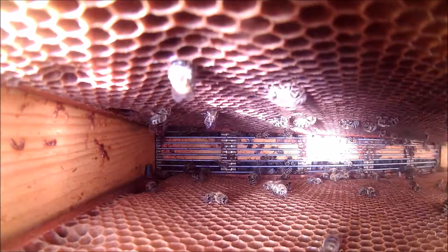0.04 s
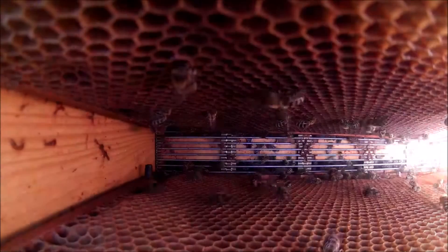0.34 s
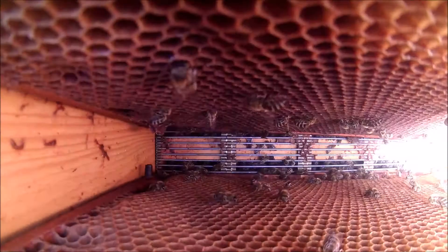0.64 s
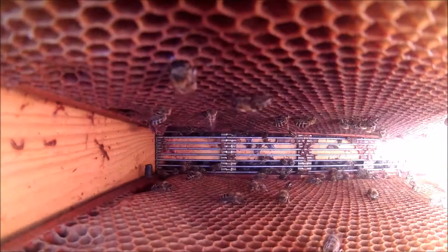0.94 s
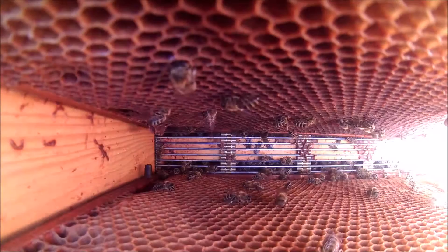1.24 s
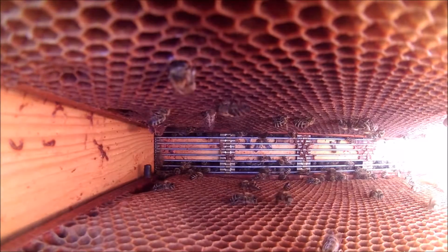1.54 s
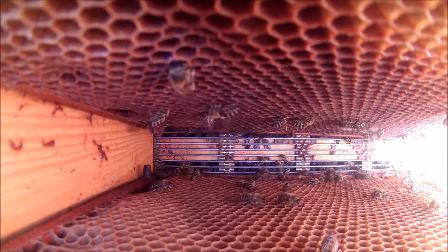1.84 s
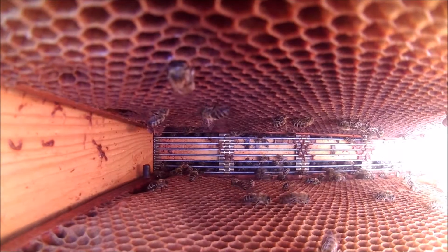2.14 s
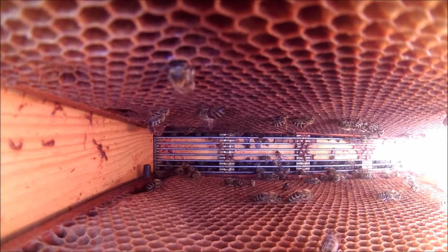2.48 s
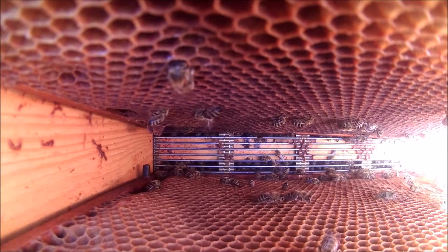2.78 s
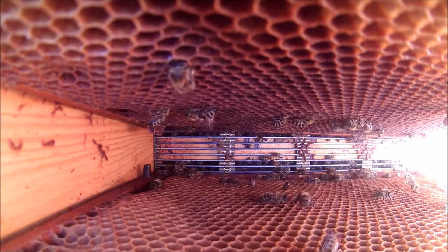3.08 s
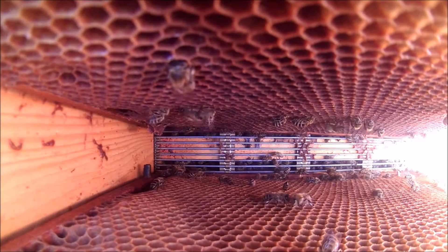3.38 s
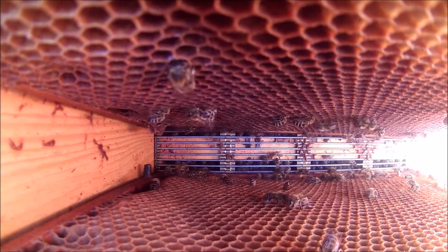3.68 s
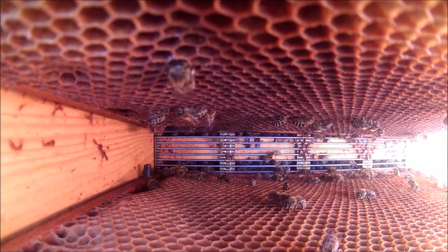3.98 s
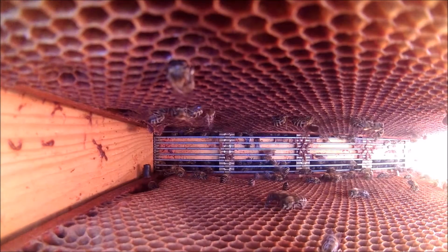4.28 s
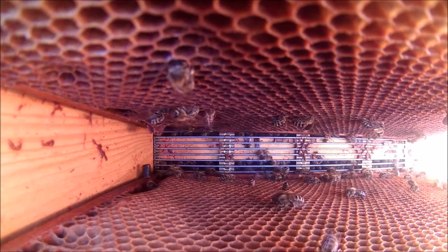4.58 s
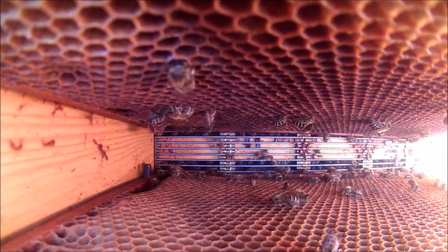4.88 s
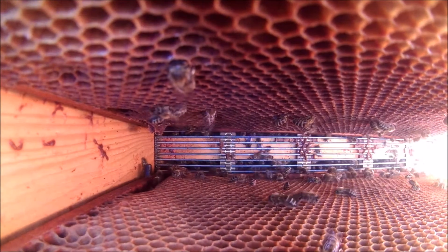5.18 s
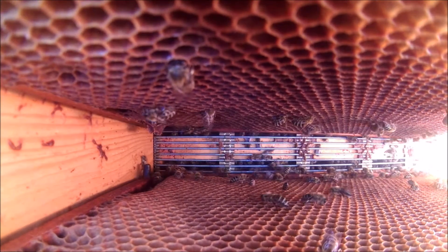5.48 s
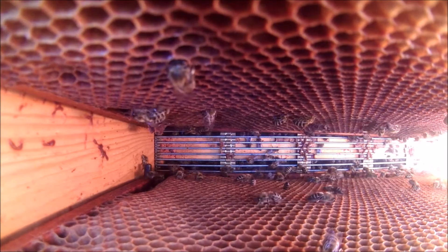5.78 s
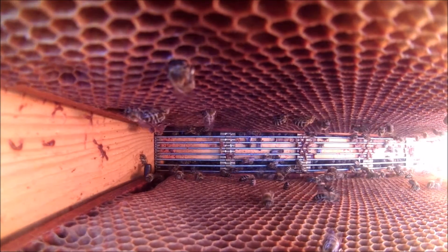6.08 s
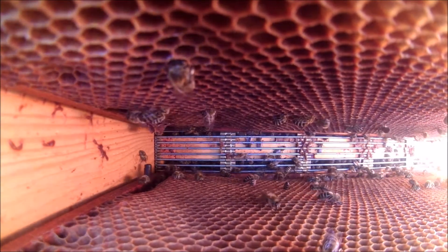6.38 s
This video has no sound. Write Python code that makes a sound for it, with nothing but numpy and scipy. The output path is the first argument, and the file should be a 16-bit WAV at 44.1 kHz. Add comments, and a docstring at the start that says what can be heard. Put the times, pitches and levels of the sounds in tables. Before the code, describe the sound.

Inside a beehive, bees and wax comb scrape right against the microphone's plastic case in short, grainy strokes with small ticks. The case slides roughly, then lands on the wooden frame with one loud knock and a couple of dull bounces. Lighter scuffs, rubbing and scattered clicks follow, with two brief, faint wing whirs. A faint hive murmur and hiss lie underneath, all heard on the left only.

```python
"""Inside a beehive, a small camera lies between two honeycombs. Bees and comb scrape its case in grainy
strokes of tiny slips; small contacts tick on the plastic and wings whir briefly. The case slides, then
settles on the wooden frame with one overloading knock and two dull bounces. Under it all lie a faint
hive murmur, preamplifier hiss and a pulsing electronic whine. Only the left channel is live."""
import sys
import numpy as np
from scipy import signal
from scipy.fft import rfft, irfft, next_fast_len
from scipy.io import wavfile
from scipy.ndimage import uniform_filter1d, map_coordinates

SR = 44100
rng = np.random.default_rng(int(sys.argv[2]) if len(sys.argv) > 2 else 0)


def wav_out(sig):
    """Save sig, one row per channel (or a flat mono array), as 16-bit PCM at SR to the path in sys.argv[1]."""
    wavfile.write(sys.argv[1], SR, np.round(np.clip(np.atleast_2d(sig).T, -1, 1) * 32767).astype(np.int16))


N = 287752

# Noise spectra. Each row: frequency in Hz, density in dB. All table levels are relative.
MURMUR_SPECTRUM = [(12, -48.5), (20, -6), (65, -1.5), (167, -6.5), (213, -4.5), (245, -8.5), (311, -7),
                   (351, -11), (420, -9.5), (455, -11.5), (503, -11), (736, -15), (960, -15.5), (1290, -10),
                   (1670, -17), (2400, -24.5), (3120, -64), (5280, -120)]
HISS_SPECTRUM = [(1500, -25), (2400, -2), (3200, 0), (4300, -4), (8000, -8), (15500, -10.5)]
ROCKING_SPECTRUM = [(12, -40), (20, -3), (81, -2), (124, -6), (172, -13.5), (297, -23), (450, -25.5),
                    (580, -55.5), (990, -120)]
DRAG_SPECTRUM = [(100, -7), (220, -3.5), (400, -2), (620, -10.5), (900, -14), (2500, -42.5)]
CREEP_SPECTRUM = [(120, -33), (200, -17), (601, -8.5), (656, -15), (795, -4.5), (947, -9.5), (1230, 3.5),
                  (1630, -11.5), (1900, -6.5), (2700, -23), (3270, -18), (4030, -29), (4400, -29),
                  (7970, -45), (13000, -52.5)]
SLIDE_SPECTRUM = [(120, -37), (200, -4.5), (292, -2.5), (521, -9.5), (912, -6.5), (1200, 0.5),
                  (1570, -10.5), (1910, -8), (2700, -20.5), (3060, -16), (3670, -18.5), (4010, -28.5),
                  (5170, -30), (8720, -47.5), (15000, -60.5)]
SCUFF_SPECTRUM = [(120, -39), (200, -13.5), (422, -6), (461, -10), (581, -5), (922, -12.5), (1180, 0),
                  (1390, -9), (1880, -9.5), (3380, -23.5), (4180, -24), (8070, -43), (14000, -55.5)]
RUB_SPECTRUM = [(150, -49), (250, -11.5), (375, -7.5), (436, 2.5), (490, -7.5), (631, -0.5), (841, -12),
                (1200, 2.5), (1540, -6), (1890, -3), (3400, -25.5), (4380, -19), (8740, -37.5),
                (12000, -45), (14000, -48.5)]
BRUSH_SPECTRUM = [(180, -30), (300, -5), (415, -1), (507, -9.5), (734, -1), (844, -8.5), (1170, 1),
                  (1640, -4), (2200, -1), (3550, -18.5), (4680, -12.5), (7670, -29.5), (12000, -34),
                  (15600, -64), (22000, -120)]
CRUNCH_SPECTRUM = [(100, -15), (350, 10.5), (1200, 10.5), (2000, -4), (4000, -14.5), (8000, -20.5),
                   (15000, -16.5)]  # wax giving way
THUD_SPECTRUM = [(30, -1.5), (80, 3.5), (300, -2.5), (500, -10.5), (1150, -18), (2200, -38), (5000, -56.5)]  # comb shuddering after a blow

# Modes. Each row: frequency in Hz, level in dB, T60 in seconds.
CASE_MODES = [(235, 0, 0.033), (392.5, -5, 0.05), (515, -3.5, 0.023), (742, -9.5, 0.038), (1151, 0, 0.031),
              (1470, -4, 0.022), (1820, 4.5, 0.01), (2240, -1.5, 0.0068), (3000, -2, 0.0051),
              (3685, -14, 0.0093), (4450, 2, 0.0022), (6370, -13.5, 0.0066), (7600, -26.5, 0.0035),
              (9360, -24, 0.0055), (12300, -29, 0.0048)]
FRAME_MODES = [(67.3, -18, .36), (107.4, -19.5, 0.2), (173.6, -15.5, 0.31), (244.3, -13, 0.13),
               (324.5, 0.5, 0.065), (379, 3, 0.046), (534, -2, .045), (658, -7, 0.05), (804, -17, 0.034),
               (938, -19.5, 0.13), (1108, -19, 0.11), (1577, -12.5, 0.037), (1940, -15, 0.044),
               (2620, -24.5, .025)]
# Thin case walls that sing under friction. Each row: frequency in Hz, Q, gain in dB.
WALL_MODES = [(1240, 8.8, -16.5), (3420, 11, -10), (4580, 16, -3.5), (6500, 14, -3), (10700, 18, 4),
              (12220, 21, 3.5)]

# Soft swells. Each row: start in seconds, end in seconds, level in dB.
WING_WHIRS = [(5.324, 5.54, -61), (6.353, 6.567, -62.5)]
WAX_DRAGS = [(1.145, 1.175, -45), (2.29, 2.335, -59), (3.535, 3.58, -51), (5.035, 5.135, -53.5),
             (5.325, 5.355, -53.5)]
# Strokes. Each row: start in seconds, end in seconds, rasp (low band) in dB, fizz (high band) in dB.
CREEP_STROKES = [(0.985, 1.12, -46, -60), (1.09, 1.26, -54.5, -66.5), (1.24, 1.42, -64, -73),
                 (1.405, 1.49, -53, -61.5), (1.51, 1.74, -54.5, -69), (1.685, 2.1, -43.5, -56.5)]  # short pushes over the comb
SCUFF_STROKES = [(2.435, 2.498, -40, -49), (2.66, 3.26, -58.5, -71.5), (2.74, 2.79, -60, -65),
                 (2.812, 2.856, -41.5, -50.5), (2.853, 2.9, -44.5, -63.5), (3.015, 3.11, -49.5, -56),
                 (3.078, 3.15, -42, -60), (3.62, 3.7, -64, -85), (3.77, 3.87, -56.5, -80)]  # case settling
RUB_STROKES = [(4.385, 4.7, -43, -57)]
BRUSH_STROKES = [(5.57, 6.01, -53, -62.5), (6.03, 6.11, -57, -64), (6.3, 6.365, -57, -68),
                 (6.45, 6.54, -55, -64.5)]
# Pressure of one hard slide. Each row: time in seconds, rasp in dB, fizz in dB.
SLIDE_CURVE = [(1.935, -42, -52), (1.978, -29.5, -41), (2.05, -30.5, -40.5), (2.075, -30, -36.5),
               (2.142, -25, -29.5), (2.16, -32.5, -45.5), (2.174, -27, -33.5), (2.192, -35.5, -59),
               (2.235, -45, -64), (2.252, -52.5, -86)]

# Case against wax. Each row: time in seconds, peak in dB, pitch in Hz.
WAX_BUMPS = [(0.995, -44, 89), (1.599, -35, 110), (2.177, -18.5, 60), (2.306, -33, 143), (2.48, -28, 70),
             (2.898, -40, 90), (3.554, -41, 115), (4.411, -45, 90), (4.585, -47, 125), (4.884, -38.5, 82),
             (5.008, -38, 77), (5.115, -41.5, 103), (5.164, -40, 84.5), (5.334, -44.5, 128),
             (5.526, -41, 226), (5.638, -41.5, 94), (6.16, -44, 53.5), (6.334, -42, 49)]
# Contacts on the case. Each row: time in seconds, ring peak in dB, thump and snap in dB re ring,
# pitch of the touched spot in Hz.
CASE_TICKS = [(0.971, -36.5, -0.5, -9, 1070), (1.03, -27.5, -8.5, 5, 3280), (1.1351, -35, -21, -5, 1140),
              (1.4673, -37.5, -13, 3, 1390), (1.6266, -15.5, -15, -9, 1750), (1.653, -33.5, -7, -8, 1230),
              (1.719, -36, -3, -2, 1750), (1.7761, -29.5, -28, -4, 1090), (2.175, -11.5, -1, 2.5, 2300),
              (2.214, -25, -8, -10.5, 790), (2.3277, -39.5, -15, -2.5, 2140), (2.4107, -42, -19, -1, 664),
              (2.4821, -35.5, 0, -1, 1140), (2.8182, -29, -26, -3.5, 1200), (2.8608, -26.5, -24, -22, 1150),
              (3.0195, -42.5, -11, 5.5, 630), (3.0871, -34, -16, 0.5, 1140),
              (3.1233, -30.5, 0.5, -5.5, 1160), (3.196, -41.5, -12, -7, 710), (3.2858, -40, -28, -17, 714),
              (3.4708, -26, -6.5, -8, 1290), (3.5245, -38, -1, -2, 710), (3.5505, -36.5, -4, -7, 870),
              (3.7804, -43.5, -23, -5.5, 790), (4.0376, -44.5, -8, -23, 1200),
              (4.1938, -44.5, -8, -23, 734), (4.4199, -27, -14, -4, 1148), (4.4306, -38.5, -7, 3, 940),
              (4.8764, -43.5, -2, -20, 1250), (4.8909, -23.5, -11.5, -5.5, 1154),
              (5.0053, -35.5, -10, -5.5, 1830), (5.0356, -25.5, -10, -8, 1325),
              (5.1164, -41.5, 1, -18, 654), (5.1638, -32, -9.5, -8, 1010), (5.219, -41.5, -31, -26, 1070),
              (5.6955, -36.5, -25, -1.5, 2200), (5.72, -33.5, -34, -6, 2010), (6.0335, -29, -14, -3, 1447),
              (6.1513, -32, -11.5, -23, 1800), (6.3009, -33, -30, -23, 746)]
# Blows on the frame. Each row: time in seconds, level in dB, low-pass cutoff in Hz,
# seconds for the crunch to fall 20 dB, wood ring in dB.
FRAME_KNOCKS = [(2.174, -15.5, 230, 0.024, 1.5), (2.52, -1.5, 5600, 0.021, 1),
                (2.534, -11, 9000, 0.011, -6.5), (2.542, -24, 5000, 0.0069, -2),
                (2.601, -17, 1633, 0.025, -5), (2.623, -24.5, 1200, 0.021, -8),
                (2.64, -19.5, 1560, 0.034, -12)]

THUMP_TOP_HZ, SPLIT_HZ, BAND_LIMIT_HZ = 600, 2700, 15830


def amp(db):
    """Decibels to gain."""
    return 10 ** (np.asarray(db) / 20)


def unit_rms(x):
    """Scale to rms 1."""
    return x / np.sqrt(np.mean(x ** 2) + 1e-20)


def unit_peak(x):
    """Scale to peak 1."""
    return x / (np.abs(x).max() + 1e-12)


def filtered(x, response):
    """Apply a gain given as a function of Hz."""
    size = next_fast_len(len(x) + 8192)
    return irfft(rfft(x, size) * response(np.fft.rfftfreq(size, 1 / SR)), size)[:len(x)]


def coloured(x, spectrum):
    """Shape x by a spectrum table, at rms 1."""
    knot_hz, db = np.transpose(spectrum)
    return unit_rms(filtered(x, lambda hz: amp(np.interp(np.log(hz + 1), np.log(knot_hz + 1), db))))


def noise(spectrum, samples=N):
    """Coloured noise at rms 1."""
    return coloured(rng.standard_normal(samples), spectrum)


def band(x, hz, kind, order=2):
    """Causal low-pass or high-pass."""
    return signal.sosfilt(signal.butter(order, min(hz, .45 * SR), kind, fs=SR, output="sos"), x)


def resonance(x, hz, q):
    """One resonant band-pass."""
    return signal.lfilter(*signal.iirpeak(hz, q, fs=SR), x)


def wobble(knots_per_s):
    """Smooth random curve."""
    knots = rng.standard_normal(int(N * knots_per_s / SR) + 4)
    return map_coordinates(knots, [np.arange(N) * knots_per_s / SR])


def ringing(modes, t, scatter_db):
    """One damped sine per mode, each at a random strength."""
    hz, db, t60_s = np.transpose(modes)[:, :, None]
    struck_db = db + scatter_db * rng.standard_normal(hz.shape)
    return amp(struck_db - 60 * t / t60_s) * np.sin(2 * np.pi * hz * t)


def add(track, start_s, sound):
    """Mix a sound into the track."""
    part = track[round(start_s * SR):][:len(sound)]
    part += sound[:len(part)]


def swells(rows):
    """Rounded rise and fall per row."""
    t, gain = np.arange(N) / SR, np.zeros(N)
    for start_s, end_s, db in rows:
        progress = np.clip((t - start_s) / (end_s - start_s), 0, 1)
        gain += amp(db) * np.sqrt(np.abs(np.sin(np.pi * progress)))
    return gain


def curve_gains(rows):
    """Gain per sample for each dB column, silent outside the rows."""
    t = np.arange(N) / SR
    times_s, *columns_db = np.transpose(rows)
    return amp([np.interp(t, times_s, db, left=-150, right=-150) for db in columns_db])


def strokes(rows, attack, release):
    """Rasp and fizz gains: press, hold, let go. Attack and release are shares of each stroke."""
    t, gains = np.arange(N) / SR, np.zeros((2, N))
    for start_s, end_s, rasp_db, fizz_db in rows:
        progress = (t - start_s) / (end_s - start_s)
        envelope = np.clip(np.minimum(progress / attack, (1 - progress) / release), 0, 1)
        gains += amp([[rasp_db], [fizz_db]]) * envelope
    return gains


def hive_murmur():
    """Distant colony: low, nearly steady noise."""
    return amp(-59 + 0.22 * wobble(3)) * noise(MURMUR_SPECTRUM)


def electronics(whine_hz=10020, pulse_hz=38.27, duty=0.47):
    """Preamplifier hiss and a whine that switches on and off."""
    t = np.arange(N) / SR
    hiss = amp(-69.5) * noise(HISS_SPECTRUM)
    gate = uniform_filter1d(1. * (t * pulse_hz % 1 < duty), size=60)
    whine = amp(-76) * gate * np.sqrt(2) * np.sin(2 * np.pi * whine_hz * t)
    return hiss + whine


def wings(wingbeat_hz=227, octave_db=-14, waver=0.008):
    """Faint bee whirs: a wavering wingbeat tone with a weak octave."""
    phase = 2 * np.pi * np.cumsum(wingbeat_hz * (1 + waver * wobble(20))) / SR
    return swells(WING_WHIRS) * unit_rms(np.sin(phase) + amp(octave_db) * np.sin(2 * phase))


def sway(push, t60_s=0.46):
    """Rumble of the case rocking on wax; lags the push and outlasts it."""
    pole = np.exp(-np.log(1000) / (t60_s * SR))
    return signal.lfilter([1 - pole], [1, -pole], push) * noise(ROCKING_SPECTRUM)


def rocking(bump_db=-20, knock_db=-42, settle_db_per_s=32):
    """Each bump and knock leaves the case rocking; it settles slowly."""
    t = np.arange(N) / SR
    shoves = [(at_s, db + bump_db) for at_s, db, _ in WAX_BUMPS]
    shoves += [(at_s, db + knock_db) for at_s, db, *_ in FRAME_KNOCKS]
    power = sum((t > at_s) * amp(db - settle_db_per_s * np.abs(t - at_s)) ** 2 for at_s, db in shoves)
    return sway(np.sqrt(power))


def drags():
    """Soft wax gives without catching, so only the low case modes answer."""
    return swells(WAX_DRAGS) * noise(DRAG_SPECTRUM)


def bumps(decay_cycles=0.44):
    """A soft push swings the case for a cycle or two."""
    out, t = np.zeros(N), np.arange(SR // 6) / SR
    for at_s, db, hz in WAX_BUMPS:
        cycles = hz * t
        swing = np.sin(2 * np.pi * cycles) * cycles * np.exp(-cycles / decay_cycles)
        add(out, at_s, amp(db) * unit_peak(swing))
    return out


def stray_ticks(count=8, span_s=(2.2, 6.5), ring_db=-48.5, thump_db=-13.5, snap_db=-7, spot_hz=955):
    """Rows of faint ticks at random times and spots on the case."""
    times_s = rng.uniform(*span_s, count)
    scatter = rng.standard_normal((count, 2))
    return [(at_s, ring_db + 2 * size, thump_db, snap_db, spot_hz * np.exp(0.25 * spot))
            for at_s, (size, spot) in zip(times_s, scatter)]


def ticks(spot_t60_s=0.018, grit_t60_s=0.038, snap_t60_s=0.011, rise_s=0.00025, snap_trim_db=-1):
    """A small contact lets go: the case thumps, rings and snaps in its low, middle and high modes."""
    out, t = np.zeros(N), np.arange(SR // 8) / SR
    mode_hz = np.transpose(CASE_MODES)[0]
    low, high = mode_hz < THUMP_TOP_HZ, mode_hz >= SPLIT_HZ
    case_spectrum = [(hz, db) for hz, db, _ in CASE_MODES]
    onset = 1 - np.exp(-t / rise_s)
    for at_s, db, thump_db, snap_db, spot_hz in CASE_TICKS + stray_ticks():
        modes = ringing(CASE_MODES, t, scatter_db=2.5) * rng.choice([-1, 1], (len(CASE_MODES), 1))
        spot = 2.4 * np.sin(2 * np.pi * spot_hz * t) * amp(-60 * t / spot_t60_s)
        grit = noise(case_spectrum, len(t)) / 2  # crumbling wax; its treble dies first
        low_grit = band(grit, SPLIT_HZ, "low") * amp(-60 * t / grit_t60_s)
        high_grit = band(grit, SPLIT_HZ, "high") * amp(-60 * t / snap_t60_s)
        thump = modes[low].sum(0)
        ring = modes[~low & ~high].sum(0) + spot + low_grit
        snap = modes[high].sum(0) + high_grit
        for part, part_db in [(ring, 0), (thump, thump_db), (snap, snap_db + snap_trim_db)]:
            add(out, at_s, amp(db + part_db) * unit_peak(part * onset))
    return out


def scrape(pressure, spectrum, slips_per_s, smooth, jerk_db, rasp_db, fizz_db, sway_db,
           bite=0, bite_hz=5500):
    """Tiny uneven slips shake and rock the case in jerks; bite brightens the hardest pressure."""
    slips = (rng.random(N) < slips_per_s / SR) * rng.choice([-1, 1], N)
    slips = slips * amp(3 * np.minimum(rng.exponential(size=N), 3))  # sizes span 9 dB
    friction = unit_rms(slips) + smooth * rng.standard_normal(N)
    friction *= amp(jerk_db * wobble(110))
    walls = sum(amp(db) * resonance(friction, hz, q) for hz, q, db in WALL_MODES)
    vibration = coloured(friction + walls, spectrum)
    low = unit_rms(band(vibration, SPLIT_HZ, "low", order=5))
    high = unit_rms(band(vibration, SPLIT_HZ, "high", order=5))
    rasp, fizz = pressure
    edge = filtered(high, lambda hz: hz ** 8 / (hz ** 8 + bite_hz ** 8))
    high += bite * (fizz / fizz.max() - .5) * edge
    rumble = sway((rasp / rasp.max()) ** 0.56)  # 0.56 dB of rocking per dB of rasp
    return amp(rasp_db) * rasp * low + amp(fizz_db) * fizz * high + amp(sway_db) * rumble


def scrapes():
    """Bees and comb along the case: creep, hard slide, scuffs, firm rub, light brushing."""
    creep = scrape(strokes(CREEP_STROKES, attack=0.16, release=0.3), CREEP_SPECTRUM, slips_per_s=2000,
                   smooth=1, jerk_db=2.3, rasp_db=-0.26, fizz_db=1.6, sway_db=-43.5)
    slide = scrape(curve_gains(SLIDE_CURVE), SLIDE_SPECTRUM, slips_per_s=1800,
                   smooth=0.55, jerk_db=2.3, rasp_db=1, fizz_db=-0.5, sway_db=-28, bite=0.9)
    scuffs = scrape(strokes(SCUFF_STROKES, attack=0.15, release=0.42), SCUFF_SPECTRUM, slips_per_s=3000,
                    smooth=1, jerk_db=3, rasp_db=0.2, fizz_db=-2, sway_db=-48)
    rub = scrape(strokes(RUB_STROKES, attack=0.32, release=0.32), RUB_SPECTRUM, slips_per_s=1500,
                 smooth=0.8, jerk_db=2.5, rasp_db=0, fizz_db=-0.5, sway_db=-55)
    brush = scrape(strokes(BRUSH_STROKES, attack=0.29, release=0.12), BRUSH_SPECTRUM, slips_per_s=2100,
                   smooth=0.68, jerk_db=3, rasp_db=0.4, fizz_db=-1, sway_db=-56.5)
    return creep + slide + scuffs + rub + brush


def knocks(crunch_db=-7, thud_db=-19, thud_t60_s=0.26, rise_s=0.0022):
    """The case drops against the frame and bounces; softer contacts are duller."""
    out, t = np.zeros(N), np.arange(SR // 2) / SR
    onset = 1 - np.exp(-t / rise_s)
    for at_s, db, cutoff_hz, crunch_s, wood_db in FRAME_KNOCKS:
        wood = amp(wood_db) * ringing(FRAME_MODES, t, scatter_db=1).sum(0)
        crunch = noise(CRUNCH_SPECTRUM, len(t)) * amp(crunch_db - 20 * t / crunch_s)
        thud = noise(THUD_SPECTRUM, len(t)) * amp(thud_db - 60 * t / thud_t60_s)
        blow = (wood + crunch + thud) * onset
        add(out, at_s, amp(db) * band(blow, cutoff_hz, "low"))
    return out


def scene():
    """One microphone, wired to the left channel."""
    friction = scrapes() + drags()
    contacts = rocking() + bumps() + ticks() + knocks()
    microphone = friction + contacts + wings() + hive_murmur() + electronics()
    return np.array([2 * microphone, np.zeros(N)])


def record(dry):
    """The input soft-clips the hardest blows and passes nothing above its band limit."""
    clipped = dry / (1 + np.abs(dry) ** 6) ** (1 / 6)
    return np.array([filtered(channel, lambda hz: hz < BAND_LIMIT_HZ) for channel in clipped])


dry = scene()
out = record(dry)
wav_out(out)
```